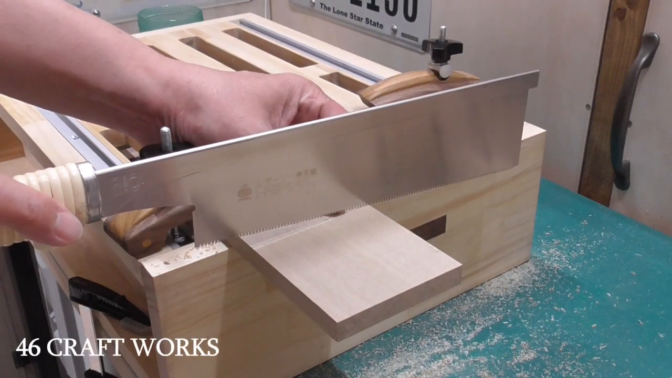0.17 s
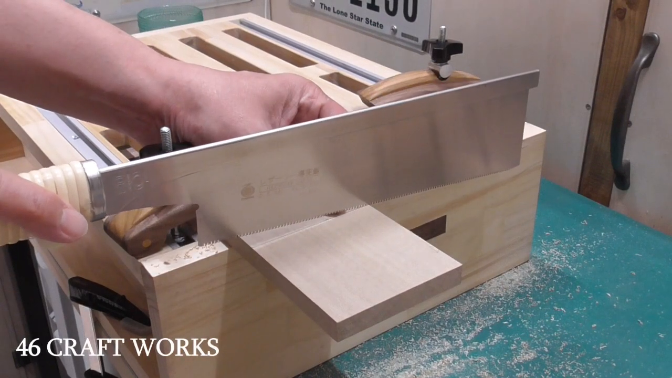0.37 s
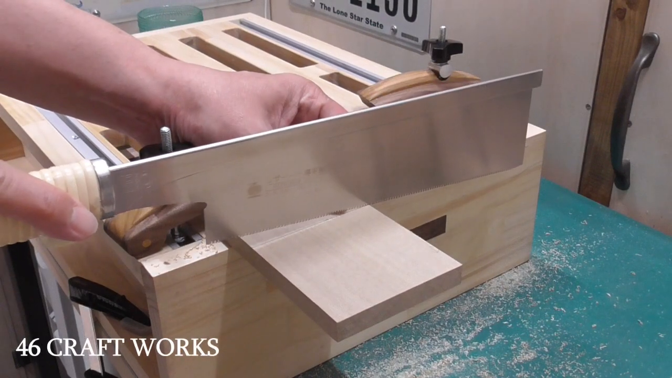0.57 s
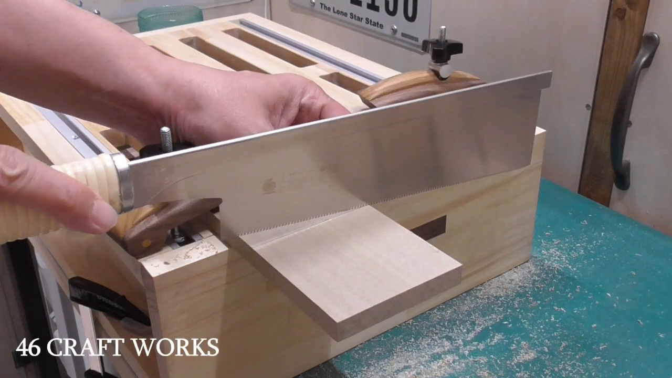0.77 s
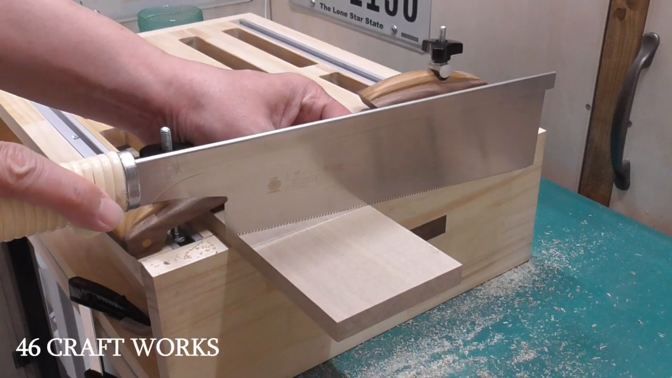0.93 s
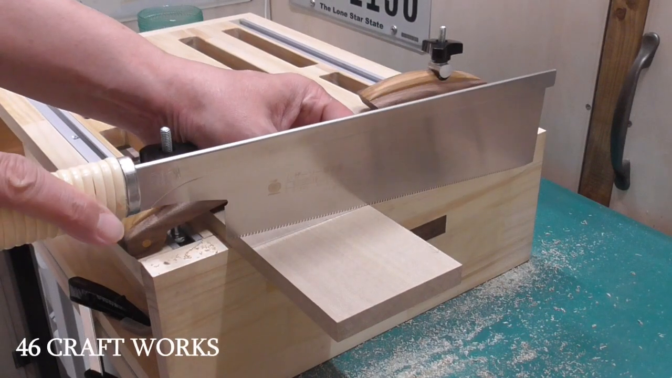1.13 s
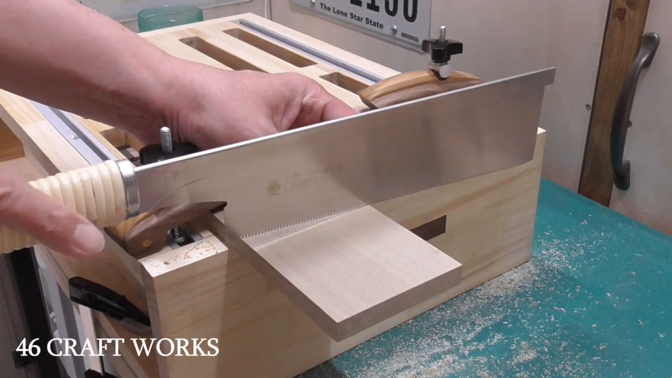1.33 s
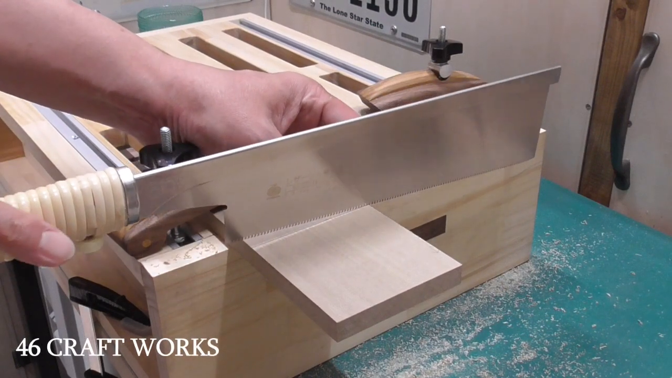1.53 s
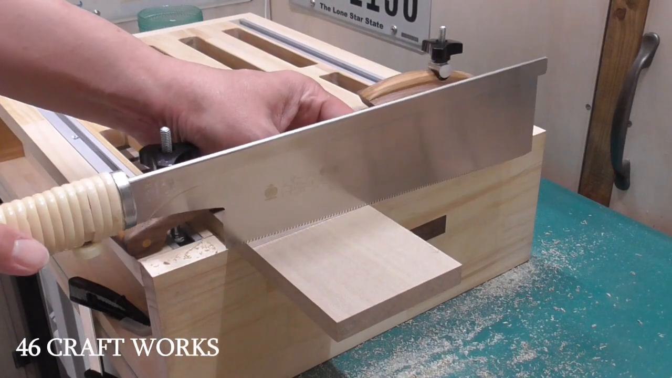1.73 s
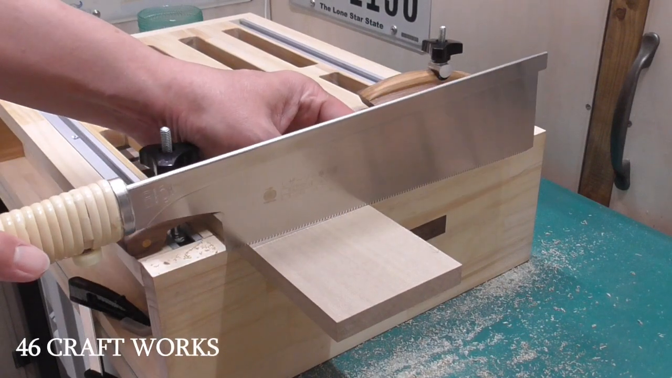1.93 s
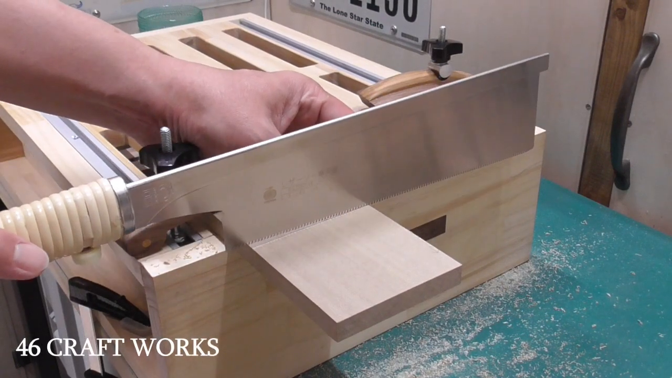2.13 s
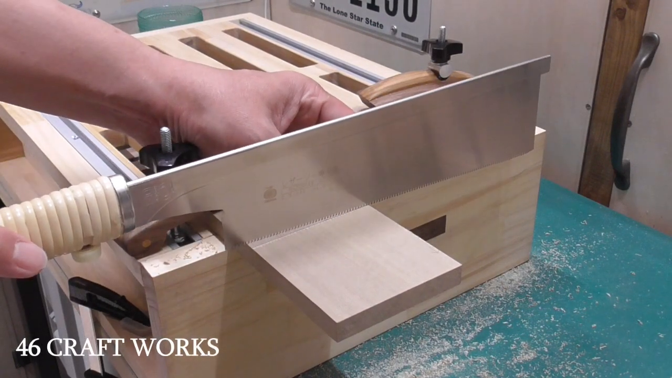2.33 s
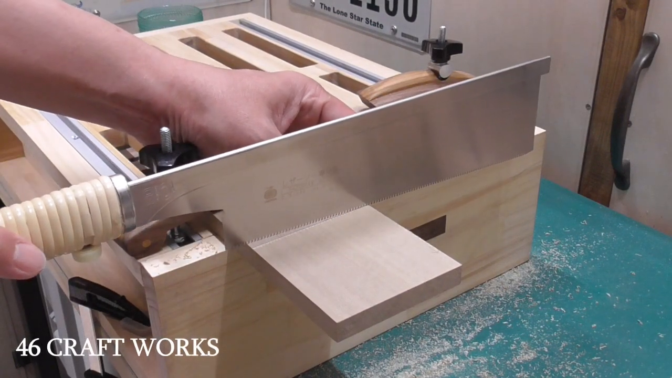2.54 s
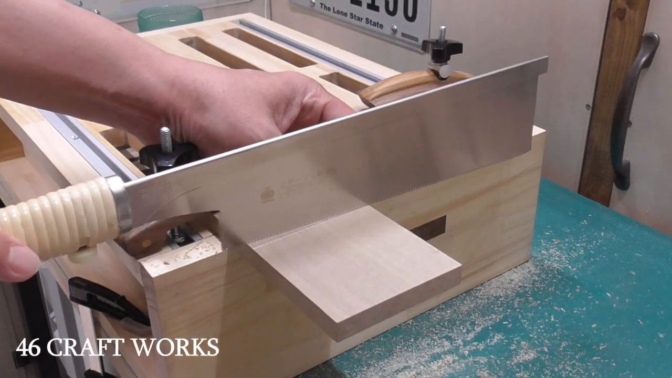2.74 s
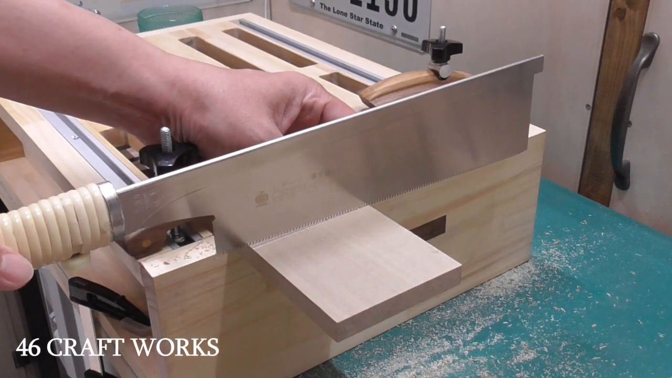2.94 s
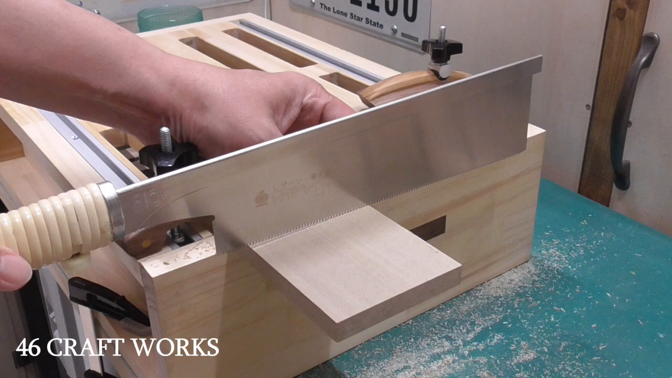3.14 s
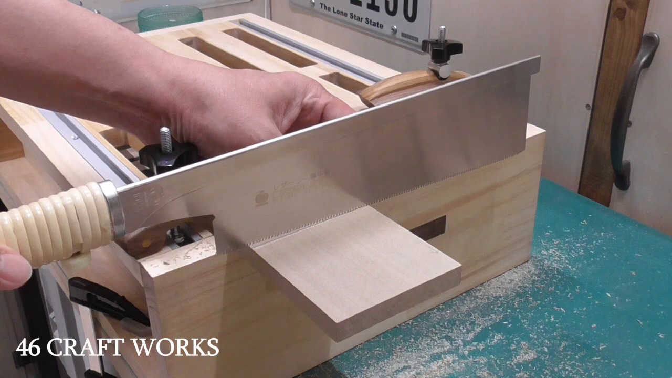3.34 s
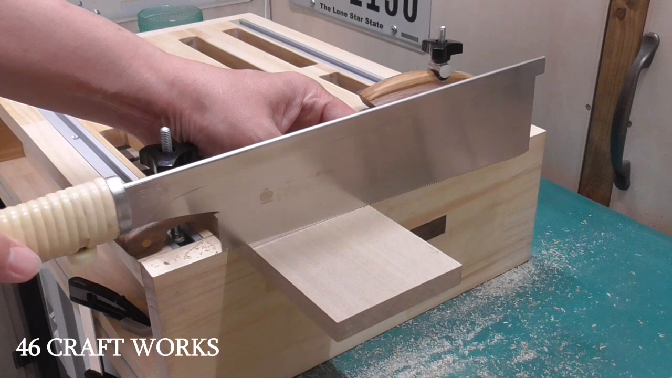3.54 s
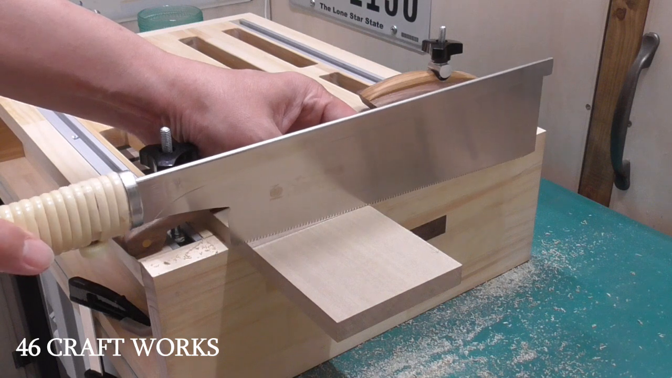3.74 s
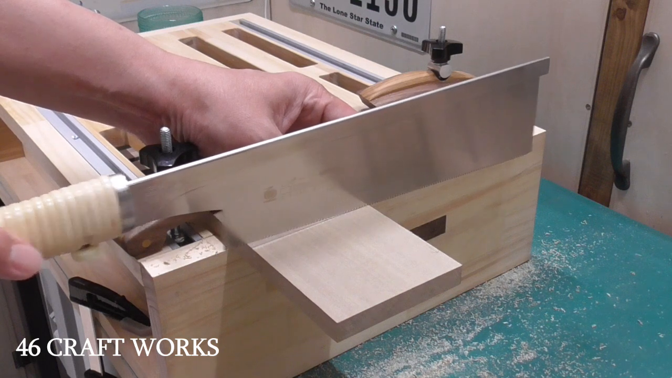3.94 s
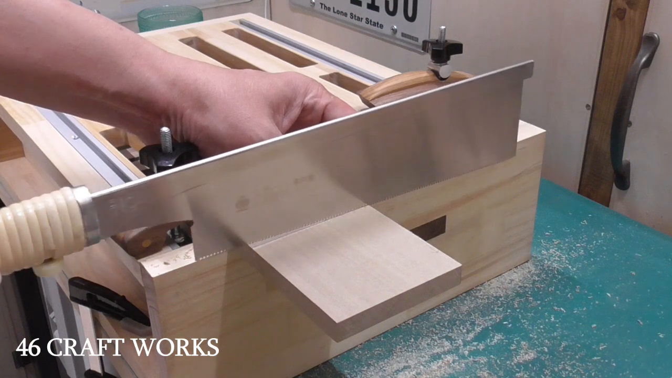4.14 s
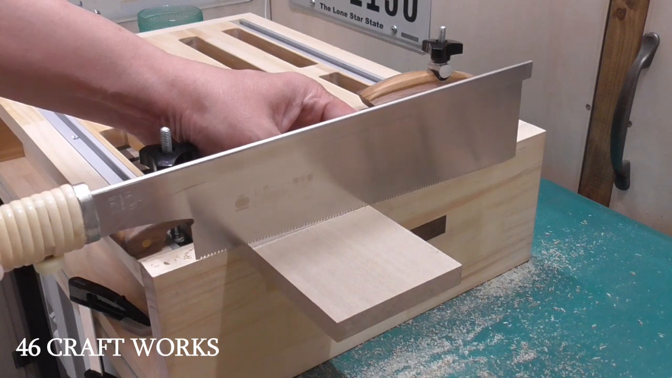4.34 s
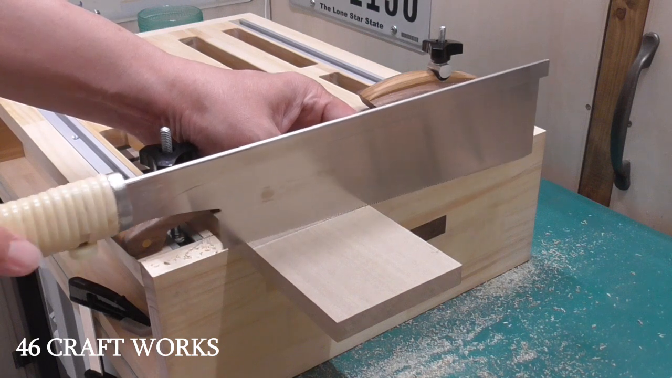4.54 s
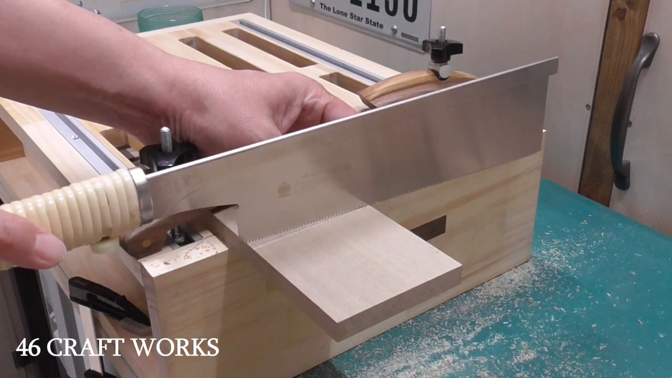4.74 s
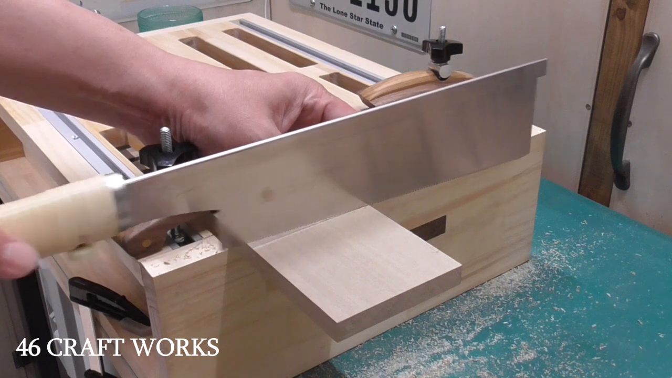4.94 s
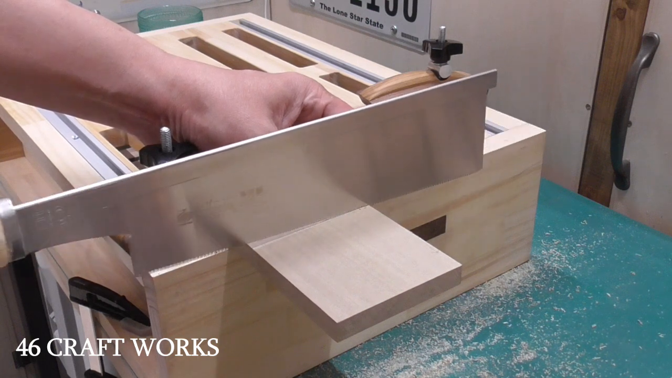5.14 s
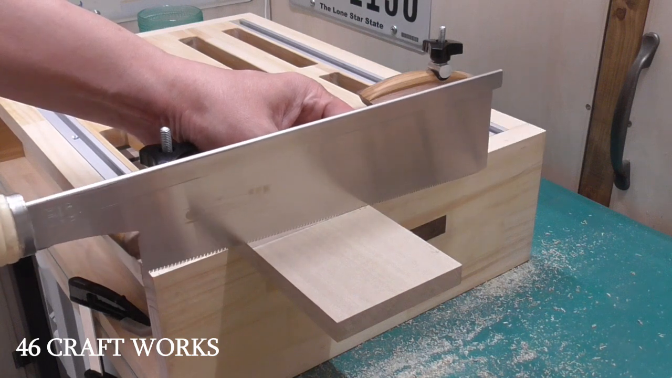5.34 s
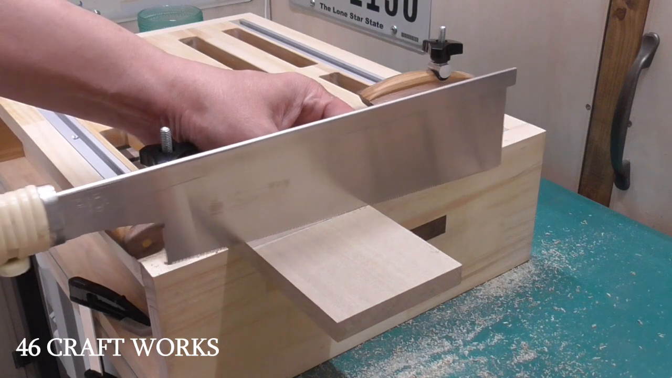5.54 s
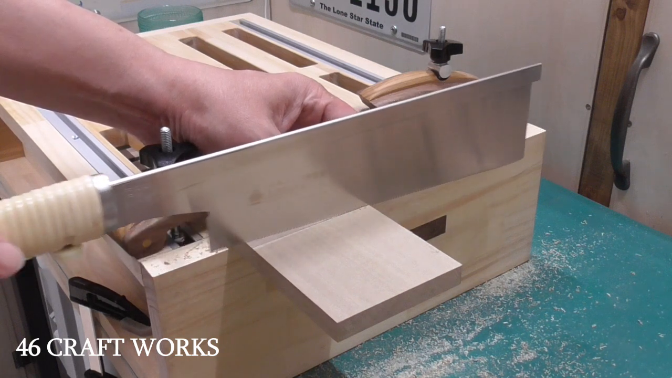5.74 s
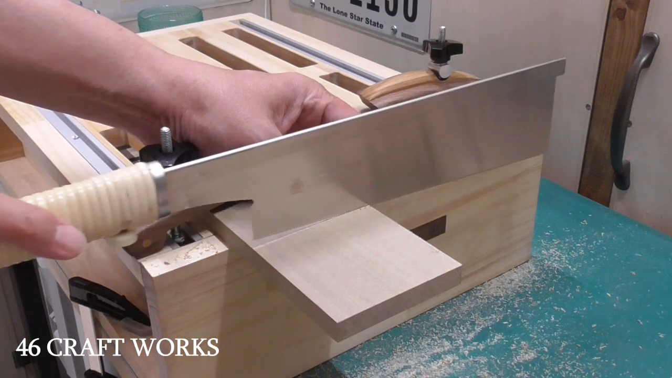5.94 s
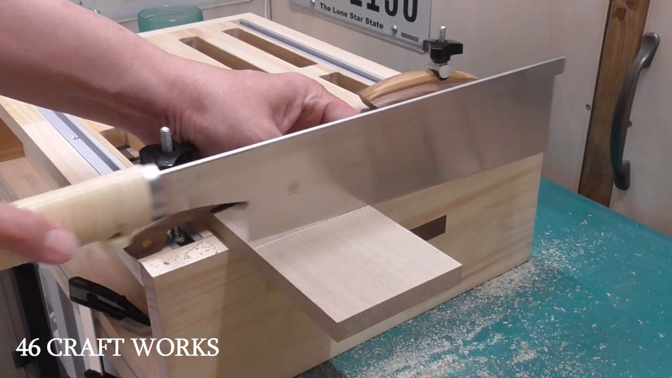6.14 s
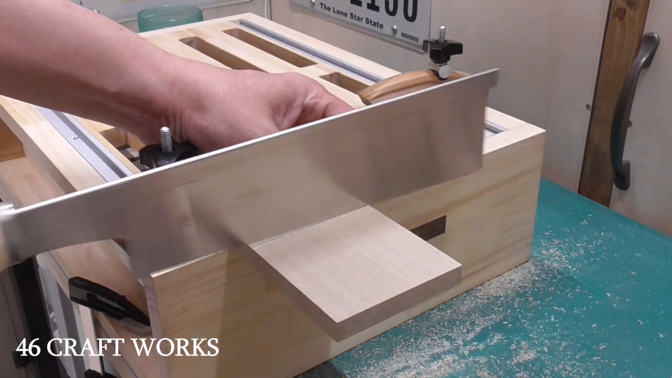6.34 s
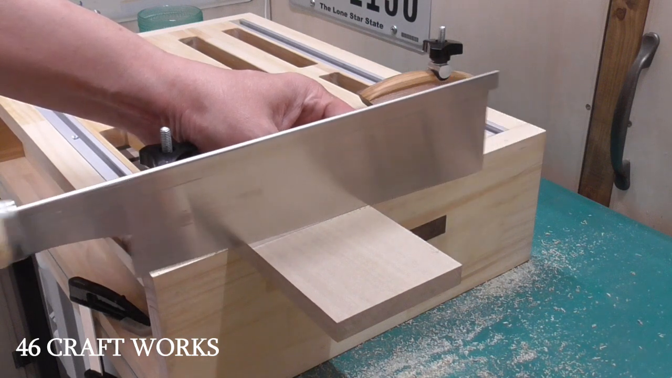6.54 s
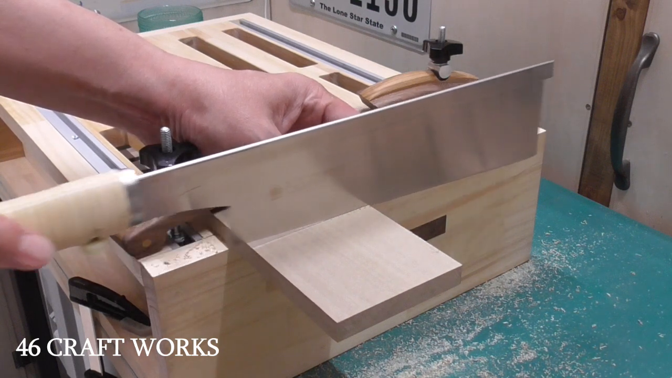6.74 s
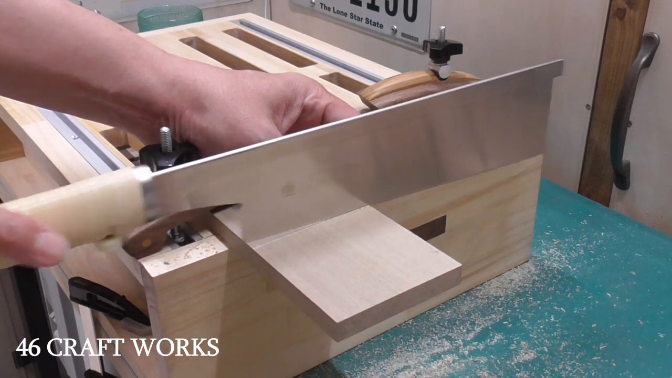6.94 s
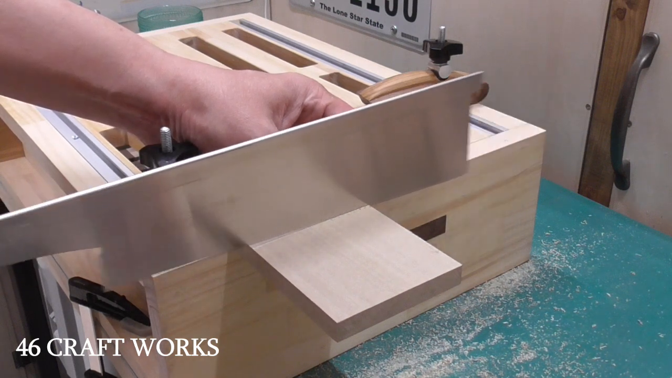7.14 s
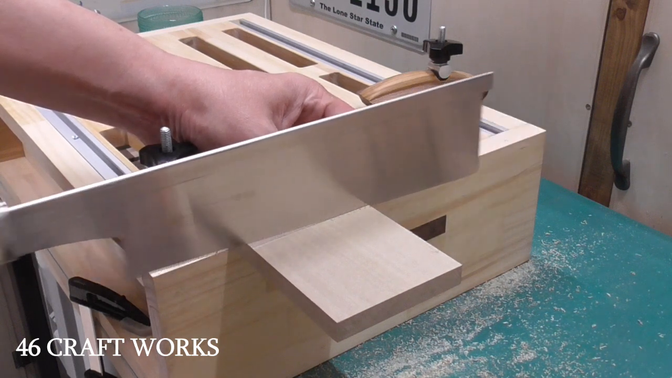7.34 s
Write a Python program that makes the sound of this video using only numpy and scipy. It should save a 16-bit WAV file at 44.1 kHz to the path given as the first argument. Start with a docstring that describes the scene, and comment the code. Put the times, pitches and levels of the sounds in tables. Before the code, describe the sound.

A thin hand saw works on a wooden board, heard close in a small workshop over faint steady room noise. For the first 1.4 seconds the teeth ease into the wood with light ticks, small knocks and soft scrapes. The saw then rests: a hand brushes very faintly over the handle, there is a soft rub around 2 seconds, and tiny dry creaks come near 2.5 seconds. At 2.8 seconds comes one short trial stroke with a sharp catch, and a brief push follows at 3.6 seconds. From 4 seconds the sawing finds a rhythm and grows louder, with bright, biting pulls at about 4, 5, 6.2 and 7 seconds. Duller pushes slide between them and set the board droning. The steel rings slightly, the wooden guide rattles, and the binding blade causes low judders while the bench hums. A last push begins around 7.3 seconds.

```python
"""In a small workshop, close by, a thin pull saw crosscuts a board held in a wooden guide.
The blade is eased into the kerf tooth by tooth, rests while the hand takes a new grip, makes one short
trial stroke and settles into a rhythm. The impacts of the teeth force the steel blade, the guide and
the board to vibrate in their modes: pulls bite and rasp brightly; pushes slide back duller and set
the board droning. The bench hums in sympathy, over the faint noise of the room."""
import sys
import numpy as np
from scipy import signal
from scipy.fft import rfft, irfft, next_fast_len
from scipy.io import wavfile

SR = 44100
rng = np.random.default_rng(int(sys.argv[2]) if len(sys.argv) > 2 else 0)


def transcribe(u):
    """Save the signal u as a 16-bit wav file named by the first command-line argument.

    u: samples, shape (n,) or (channels, n), limited to [-1, 1]; the rate is SR.
    q: integer samples, one column per channel.
    """
    v = np.clip(np.atleast_2d(u).T, -1, 1)
    q = np.round(v * 32767).astype(np.int16)
    wavfile.write(sys.argv[1], SR, q)


N = 326340
TIME = np.arange(N) / SR
HZ = np.fft.rfftfreq(8192, 1 / SR)

# modes of the clamped board and the guide: (frequency [Hz], width [Hz], pull level [dB], push level [dB])
BOARD_MODES = [(86.6, 21.2, -12.5, -21), (115, 8.3, -13.5, -16), (180.8, 17.3, -2, -8),
               (207.6, 17.5, -6, -0.5), (235, 15.6, -6.5, -1), (297.8, 54.5, -13, -14)]
GUIDE_MODES = [(385, 46, -8, -6), (452, 30, 0, 0), (492, 26, -4, -1), (597, 38, -1, 0), (660, 36, -9, -4),
               (704, 40, -3, -2), (760, 36, -7, -11), (844, 26, 0, -6), (895, 22, -1, -13), (931, 26, 1, 1),
               (991, 30, -3, -5), (1062, 56, -9, -3), (1140, 26, -4, -14), (1222, 22, -9, -19),
               (1277, 34, -5, -15), (1332, 30, -7, -12), (1418, 38, -8, -13), (1530, 110, -13, -20)]
PULL, PUSH = 0, 1  # which level column applies
# spectrum of sliding teeth: (frequency [Hz], level [dB])
SLIDING_RASP = [(1100, -33), (1650, -1.5), (2300, 2.5), (3300, 5.5), (3950, -0.5), (4950, 1.5), (5500, -7),
                (5950, -17), (6500, -12.5), (7050, -1.5), (8600, -1), (9900, -8), (10900, 2.5), (11800, -5),
                (13200, -7), (14100, -14), (15700, -17)]


def amp(db):
    """Amplitude ratio of a level in decibels."""
    return 10 ** (np.asarray(db) / 20)


def unit_rms(x):
    """Normalisation to rms 1."""
    return x / np.sqrt(np.mean(x ** 2) + 1e-20)


def steady(x, seconds):
    """Normalisation to rms 1 over a sliding window; faster fluctuations survive."""
    window = np.hanning(max(int(seconds * SR), 8))
    return x / np.sqrt(abs(signal.oaconvolve(x ** 2, window / window.sum(), "same")) + 1e-20)


def curve(points):
    """Gain from (frequency [Hz], level [dB]) points, interpolated in log frequency."""
    hz, db = np.transpose(points)
    return amp(np.interp(np.log(HZ + 1), np.log(hz + 1), db))


def resonances(modes, column=0):
    """Gain of a set of modes whose responses add in power."""
    return np.sqrt(sum(amp(db[column]) ** 2 / (1 + 2 * ((HZ - hz) / width) ** 2) ** 2
                       for hz, width, *db in modes))


def colour(x, gain):
    """Minimum-phase filtering: the ringing follows the blow."""
    log_gain = np.log(np.maximum(gain, 1e-5 * gain.max()))
    mirrored = np.r_[log_gain, log_gain[-2:0:-1]]
    taps = np.fft.ifft(np.exp(np.conj(signal.hilbert(mirrored)))).real[:len(HZ)]
    return signal.oaconvolve(x, taps)[:len(x)]


def flutter(hz, width_hz):
    """Narrow-band noise of rms 1, for random modulation."""
    slow_rate, size = 2000, 16384
    f = np.fft.rfftfreq(size, 1 / slow_rate)
    slow = irfft(rfft(rng.standard_normal(size)) * np.exp(-((f - hz) / width_hz) ** 2))
    return np.interp(TIME, np.arange(size) / slow_rate, unit_rms(slow))


def add(mix, start, sound):
    """Superposition of a sound from a start time [s]."""
    part = mix[max(round(start * SR), 0):][:len(sound)]
    part += sound[:len(part)]


def burst(gain, t60, rise):
    """Transient excitation: decaying noise through a resonant body, scaled to peak 1."""
    t = np.arange(SR // 4) / SR
    scrape = rng.standard_normal(len(t)) * amp(-60 * t / t60) * (1 - np.exp(-t / rise))
    sound = colour(scrape, gain)
    return sound / abs(sound).max()


def arch(start, length, fastest):
    """Speed of a hand movement: a skewed half sine, 1 at the share `fastest` of its length."""
    done = np.clip((TIME - start) / length, 0, 1)
    skew = np.log(.5) / np.log(np.clip(fastest, .05, .95))
    return abs(np.sin(np.pi * done ** skew))


def ringing_on(power, t60, db):
    """Energy storage: amplitude of a body that keeps some driving power and loses it exponentially."""
    kept = amp(-120 / (t60 * SR))
    stored = signal.lfilter([1 - kept], [1, -kept], power + 1e-20)
    return np.sqrt(power + amp(db) ** 2 * stored)


def reflections(x, t60):
    """Multiple reflection: about 4000 echoes a second, decaying, of total energy 1."""
    t = np.arange(SR // 2) / SR
    taps = rng.choice([-1., 1.], len(t)) * (rng.random(len(t)) < 4000 / SR) * (t > .002)
    taps *= amp(-60 * t / t60)
    return signal.oaconvolve(x, taps / np.linalg.norm(taps))[:N]


def room_air(db):
    """Ambient noise: a steady low rush, uncorrelated in mid and side."""
    # workshop air, and its side relative to its mid: (frequency [Hz], level [dB])
    spectrum = [(25, -14), (50, -9), (85, -2), (220, -1), (400, -3), (700, -6.5), (1100, -8), (1450, -10),
                (1800, -20), (4800, -20), (6200, -31), (7600, -18.5), (12000, -20.5), (15500, -23)]
    width = [(60, -9), (180, 1), (550, 0), (1650, -1.5), (4970, -2.5), (15000, 0.5)]
    mid, side = (amp(db) * unit_rms(colour(rng.standard_normal(N), curve(spectrum))) for _ in range(2))
    return mid, colour(side, curve(width))


def stroke_motion(strokes, powers, lags):
    """Power laws of blade speed give the rasp, rattle and shake; travel runs from -1 to 1 each stroke."""
    # free decay of rasp, rattle and shake: (t60 [s], level [dB])
    decays = [(.15, -17), (.25, -11.5), (.48, -11)]
    drive, travel = np.zeros((3, N)), np.zeros(N)
    for start, length, fastest, *levels in strokes:
        for part, db, power, lag in zip(drive, levels, powers, lags):
            part += (amp(db) * arch(start, length, fastest + lag) ** power) ** 2
        travel += np.interp(TIME, [start, start + length], [-1, 1], left=0, right=0)
    return [ringing_on(part, t60, db) for part, (t60, db) in zip(drive, decays)] + [travel]


def tooth_force(speed, teeth_hz, chatter_hz):
    """Impact train: each tooth snaps in and tears fibres; the thin blade chatters faster with speed."""
    passed = np.cumsum((teeth_hz * speed + 40) * amp(1.5 * flutter(0, 30))) / SR
    bite = amp(3.5 * np.clip(rng.standard_normal(N), -2, 2))[passed.astype(int)]
    tearing = 0.8 + bite * np.exp(-(passed % 1) / 0.5)
    chatter_rate = chatter_hz * speed * amp(1.88 * flutter(0, 24.26))
    sway = np.sin(2 * np.pi * np.cumsum(chatter_rate) / SR)
    chatter = amp(2 * (sway + 0.32 * flutter(27, 68)))
    return tearing * chatter * rng.standard_normal(N)


def blade_gains(spectrum):
    """Plate resonance shapes the rasp: gains for ringing steel below, the fizz of splinters above."""
    # modes of the blade: (frequency [Hz], width [Hz], level over the rasp [dB])
    modes = [(2230, 60, 1), (2447, 26, 3), (2594, 18, 6), (2869, 22, 7.5), (3205, 50, 4), (3387, 32, 6.5),
             (4897, 70, 4), (5590, 30, 3)]
    gain = curve(spectrum) * np.sqrt(1 + resonances(modes) ** 2)
    below = np.clip((6600 - HZ) / 700, 0, 1)
    return gain * below, gain * (1 - below)


def squeals(force, flare_db):
    """Frictional excitation: single blade modes swell and fade at random as the steel rubs the kerf."""
    # flaring modes: (frequency [Hz], width [Hz], level relative to the rasp [dB])
    modes = [(3206, 780, -15.5), (4850, 390, -26)]
    out = np.zeros(N)
    for hz, width, db in modes:
        ring = steady(colour(force, resonances([(hz, width, 0)])), seconds=0.076)
        flare = amp(flare_db * np.tanh(flutter(0, 24)))
        out += amp(db) * unit_rms(ring * flare)
    return out


def sawing(motion, spectrum, column, teeth_hz, chatter_hz, grain_db, dulling_db,
           blade_db, guide_db, board_db):
    """Forced vibration: one train of bites makes the blade rasp, the guide rattle and the board shake."""
    rasp, rattle, shake, travel = motion
    speed = np.sqrt(rasp / rasp.max())  # a faster blade is louder and passes more teeth
    force = tooth_force(speed, teeth_hz, chatter_hz)
    plate = force + amp(-10) * reflections(force, t60=0.049)  # waves bounce within the thin steel
    ring, fizz = (colour(plate, gain) for gain in blade_gains(spectrum))
    dulling = amp(-dulling_db * travel)  # dust fills the teeth along the stroke
    hiss = steady(ring + fizz * dulling, seconds=0.42)
    blade = rasp * (hiss + squeals(force, flare_db=30))
    guide = rattle * steady(colour(force, resonances(GUIDE_MODES, column)), seconds=0.2)
    board = shake * steady(colour(force, resonances(BOARD_MODES, column)), seconds=0.073)
    hardness = amp(grain_db * flutter(0, 46))  # the teeth cross hard and soft grain
    return hardness * (amp(blade_db) * blade + amp(guide_db) * guide + amp(board_db) * board)


def pushes():
    """Sliding friction: on forward strokes the teeth ride over the wood and the board drones."""
    # strokes: (time [s], length [s], fastest at [share], rasp [dB], rattle [dB], shake [dB])
    strokes = [(-.06, .2, 0.52, -59, -60.5, -55), (.25, .8, .56, -56.5, -56, -52),
               (.55, .3, .52, -54.5, -51, -39), (3.566, .18, .42, -49.5, -47, -32.5),
               (4.377, 0.42, 0.5, -48.5, -42.5, -30.5), (5.26, 0.36, 0.49, -56, -50, -41.5),
               (5.39, .735, .6, -45.5, -38, -24.5), (6.514, 0.42, 0.53, -37, -31.5, -26),
               (7.299, 0.31, 0.56, -37, -32.6, -28.5)]
    # exponents of speed [1] and shifts of the peak [share of stroke]: (rasp, rattle, shake)
    powers = [0.93, 0.86, 1.14]
    lags = [0, 0.0053, -0.074]
    return sawing(stroke_motion(strokes, powers, lags), SLIDING_RASP, PUSH, teeth_hz=601,
                  chatter_hz=134.2, grain_db=0.4, dulling_db=0.5,
                  blade_db=-0.5, guide_db=-0.55, board_db=-1.3)


def bench_hum(x):
    """Sympathetic resonance: the lightly damped modes of the bench hum on after a stroke."""
    # bench modes: (frequency [Hz], t60 [s], level [dB])
    modes = [(89, 1, -3.5), (182, 0.37, -0.5), (990, 0.9, -29)]
    t = np.arange(SR // 2) / SR
    response = np.zeros(len(t))
    for hz, t60, db in modes:
        decay = amp(-60 * t / t60)
        response += amp(db) * 2 * decay * np.cos(2 * np.pi * hz * t) / decay.sum()
    return signal.oaconvolve(x, response)[:N]


def tooth_catches():
    """Sudden release: a tooth slips off the kerf's edge; steel ticks, a splinter snaps, wood knocks."""
    # catches: (time [s], level [dB], offset for the knock [dB])
    catches = [(.0074, -54, -6), (0.38, -41.5, -5.5), (.4405, -41.5, -4), (0.5127, -44.5, -9),
               (0.583, -43.5, -8), (.6984, -43.5, 0), (0.8792, -41, -3), (1.019, -46.5, -7.5),
               (1.2, -45.5, -11), (1.2628, -51.5, -14), (1.3986, -48.5, -3.5), (1.942, -49, -14),
               (2.323, -57, -8), (2.806, -33, -9), (2.893, -40.5, -3), (3.2333, -55, -2), (3.512, -53, -8),
               (3.6376, -40, 1), (3.976, -38, -16), (4.325, -54, -7), (4.6584, -40, -8), (4.7456, -49, -8),
               (4.929, -47, -6)]
    wood = resonances(GUIDE_MODES, PUSH) + amp(12) * resonances(BOARD_MODES, PUSH)
    ring, fizz = blade_gains(SLIDING_RASP)
    out = np.zeros(N)
    for time, db, knock_db in catches:
        add(out, time - .002, amp(db - 1) * burst(ring, t60=0.065, rise=0.0035))
        add(out, time - .002, amp(db - 0.5) * burst(fizz, t60=0.044, rise=0.0038))
        add(out, time, amp(db + knock_db + 4) * burst(wood, t60=0.11, rise=0.0013))
    return out


def board_jolts():
    """Stick-slip: the binding blade shoves the board, rings its low modes and rattles the guide."""
    # jolts: (time [s], length [s], level [dB])
    jolts = [(0.674, 0.071, -35), (0.902, 0.048, -47), (2.877, 0.041, -29.5), (3.574, 0.027, -28),
             (3.635, 0.047, -28), (4.064, 0.08, -22.5), (4.43, 0.053, -43), (4.507, 0.096, -30),
             (5.638, 0.071, -25.5), (6.216, 0.035, -24), (6.295, 0.032, -21.5), (6.388, 0.071, -19)]
    board = resonances(BOARD_MODES, PULL) + amp(-4) * resonances(BOARD_MODES, PUSH)
    guide = amp(-23.5) * resonances(GUIDE_MODES, PULL)
    judder = steady(colour(rng.standard_normal(N), board + guide), seconds=0.03)
    drive = sum((amp(db) * arch(start, length, fastest=0.39)) ** 2 for start, length, db in jolts)
    return ringing_on(drive, t60=0.18, db=-3.5) * judder


def rubbing(moves, gain, grain_db, power):
    """Friction noise: a grainy brush whose amplitude follows a power of the speed."""
    brush = rng.standard_normal(N) * amp(grain_db * flutter(40, 60))
    swell = sum(amp(db) * arch(start, length, fastest) ** power for start, length, fastest, db in moves)
    return swell * unit_rms(colour(brush, gain))


def palm_slide():
    """Skin friction: the palm brushes back over the ribs of the wrapped handle to a new grip."""
    # slides: (time [s], length [s], fastest at [share], level [dB])
    moves = [(1.2, 0.67, 0.4, -62.5), (1.93, 0.19, 0.64, -62), (2.1, 0.21, 0.45, -70.5)]
    # spectrum of brushing skin: (frequency [Hz], level [dB])
    skin = [(120, -11), (210, 8), (450, 1.5), (900, -2), (1800, -7), (3800, 0), (6200, -8), (9200, 1.5),
            (12500, -7), (15500, -9)]
    return rubbing(moves, curve(skin), grain_db=1.5, power=0.4)


def board_nudges():
    """Dry friction: the other hand nudges the board along the fence."""
    # nudges: (time [s], length [s], fastest at [share], level [dB])
    moves = [(2.05, 0.078, 0.66, -56.5), (2.06, 0.296, 0.82, -58), (3.21, 0.079, 0.8, -64)]
    # resonances of the rub: (frequency [Hz], width [Hz], level [dB])
    modes = [(1100, 550, 3), (1650, 1200, -12)]
    return rubbing(moves, resonances(modes), grain_db=1.0, power=0.39)


def grip_creaks():
    """Stick-slip: small dry slips under the grip creak while the saw rests."""
    # slips: (time [s], level [dB])
    slips = [(2.451, -54.5), (2.473, -54), (2.494, -63), (2.537, -55), (2.594, -55), (2.628, -54),
             (2.716, -59)]
    # resonances of a creak: (frequency [Hz], width [Hz], level [dB])
    modes = [(604, 180, 6.5), (1130, 400, -3.5), (2840, 1000, -13.5), (4100, 390, -4.5)]
    out = np.zeros(N)
    for time, db in slips:
        add(out, time, amp(db) * burst(resonances(modes), t60=0.15, rise=0.00075))
    return out


def pulls():
    """Fracture: the teeth cut fibres; the hand bears down late, so the wood peaks after the rasp."""
    # strokes: (time [s], length [s], fastest at [share], rasp [dB], rattle [dB], shake [dB])
    strokes = [(2.766, .19, 0.33, -44.5, -42.5, -36.5), (3.976, .362, .225, -38, -37, -30.5),
               (4.899, 0.39, .47, -33.5, -31.5, -27), (6.131, 0.42, .47, -31, -30.5, -26.5),
               (6.936, 0.39, .49, -28.5, -29, -29)]
    # exponents of speed [1] and shifts of the peak [share of stroke]: (rasp, rattle, shake)
    powers = [2.15, 1.63, 1.52]
    lags = [0, 0.022, 0.037]
    # spectrum of cutting teeth: (frequency [Hz], level [dB])
    cutting_rasp = [(1100, -38.5), (1650, -2), (2300, -0.5), (3300, 0.5), (3900, -4.5), (4900, -1.5),
                    (5500, -7.5), (5950, -14), (6550, -14), (7100, -4.5), (8000, 0.5), (9900, -8.5),
                    (10900, -3), (11800, -7.5), (13400, -8.5), (14100, -17), (15100, -18), (15700, -27)]
    return sawing(stroke_motion(strokes, powers, lags), cutting_rasp, PULL, teeth_hz=753.6,
                  chatter_hz=84, grain_db=0.3, dulling_db=4,
                  blade_db=-0.83, guide_db=0.33, board_db=0)


def shifting_paths(x, radians, rate_hz):
    """Phase modulation: the moving blade keeps changing its paths to left and right."""
    analytic = signal.hilbert(x, next_fast_len(N))[:N]
    return (analytic * np.exp(1j * radians * flutter(0, rate_hz))).real


def scene():
    """Mid-side stereo: the saw is near the middle; echoes off bench and walls spread its treble."""
    # side over mid, and left over right: (frequency [Hz], level [dB])
    width = [(60, -9), (120, -25), (190, -32.5), (280, -11), (450, -6.5), (740, -15.5), (1200, -5.5),
             (2000, -9.5), (3300, -13.5), (5200, -5.5), (9000, -6), (14000, -4)]
    balance = [(60, 0), (190, -1), (350, -2), (700, 0.9), (1300, -0.5), (2400, -1), (4400, 1), (8100, -1.5),
               (14000, -3)]
    direct = pushes() + tooth_catches() + amp(-2) * board_jolts()
    direct += amp(1.3) * palm_slide() + amp(0.9) * board_nudges() + amp(7.5) * grip_creaks()
    direct += pulls()
    direct += bench_hum(direct)
    air_mid, air_side = room_air(db=-61.67)
    mid = direct + amp(-16.5) * reflections(direct, t60=0.11) + air_mid
    spread = shifting_paths(reflections(direct, t60=.14), radians=.8, rate_hz=30)
    side = amp(1.75) * colour(spread, curve(width)) + air_side
    lean = np.sqrt(curve(balance))
    return np.array([colour(mid + side, lean), colour(mid - side, 1 / lean)])


def record(dry):
    """Band limiting: a steep low-pass removes the highest treble."""
    low_pass = signal.firwin(511, cutoff=15650, window=("kaiser", 9), fs=SR)
    return signal.oaconvolve(dry, low_pass[None], "same")


dry = scene()
out = record(dry)
transcribe(out)
```